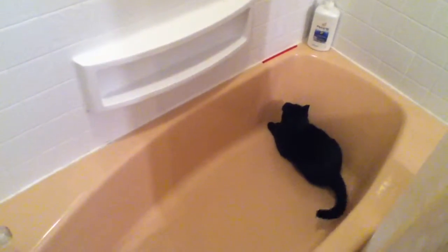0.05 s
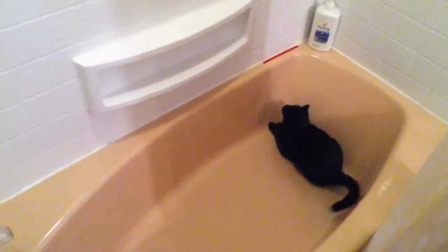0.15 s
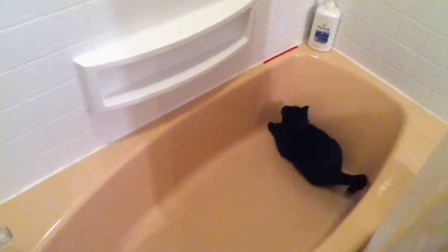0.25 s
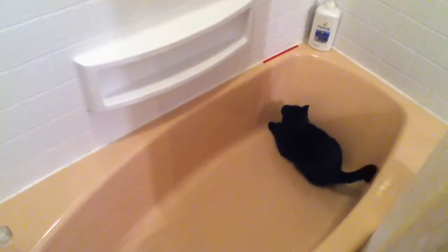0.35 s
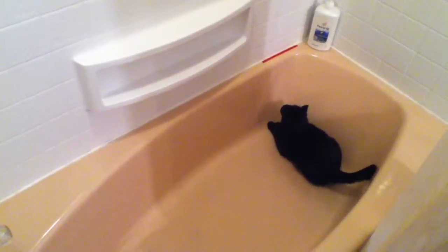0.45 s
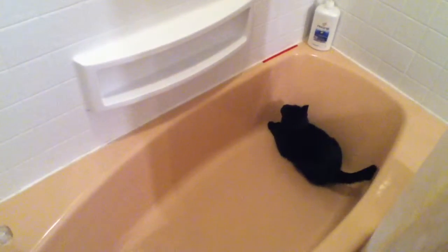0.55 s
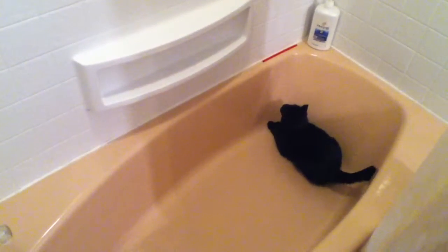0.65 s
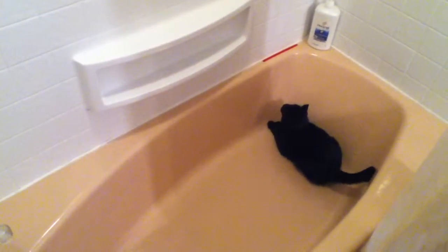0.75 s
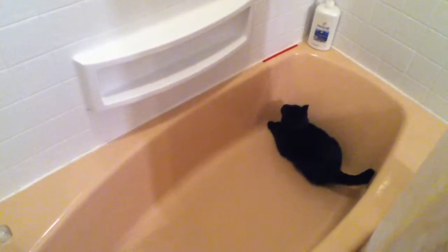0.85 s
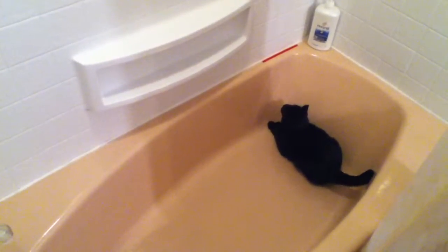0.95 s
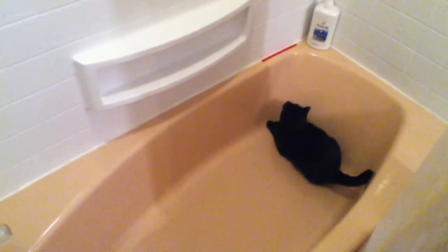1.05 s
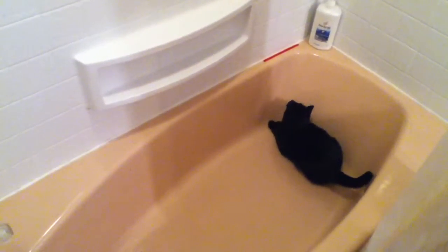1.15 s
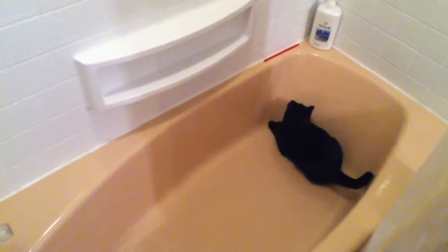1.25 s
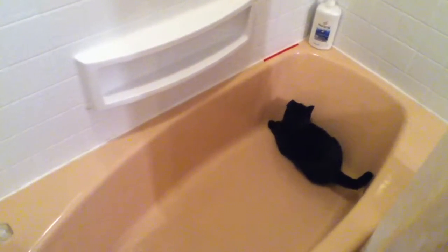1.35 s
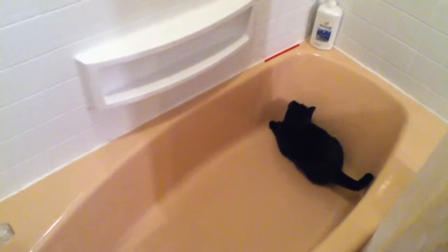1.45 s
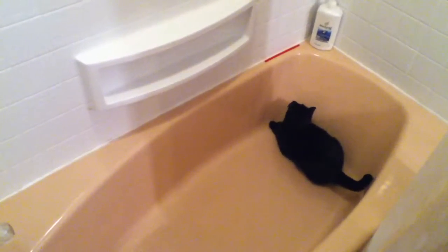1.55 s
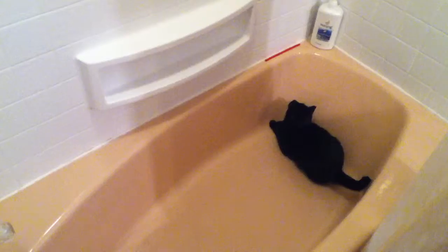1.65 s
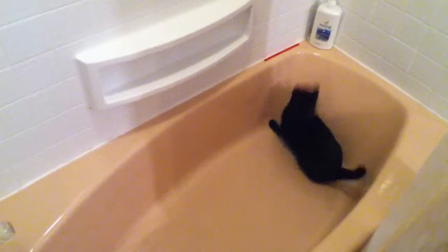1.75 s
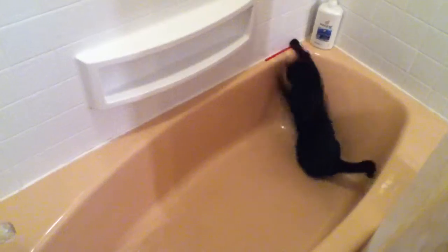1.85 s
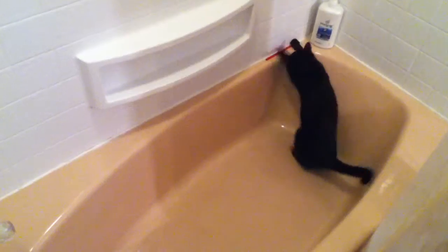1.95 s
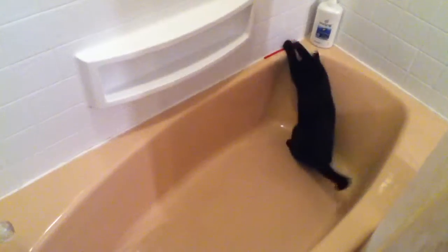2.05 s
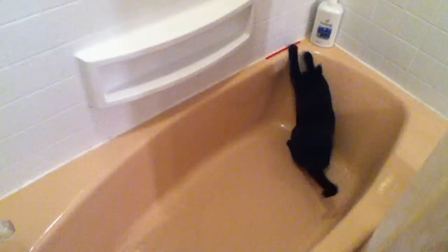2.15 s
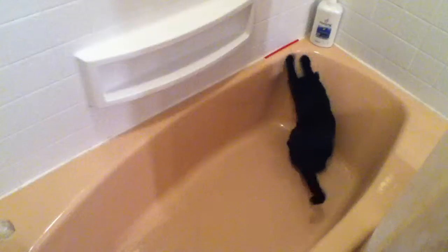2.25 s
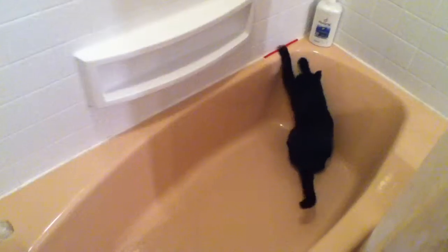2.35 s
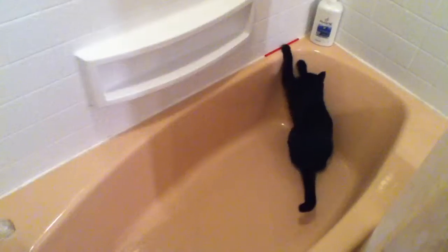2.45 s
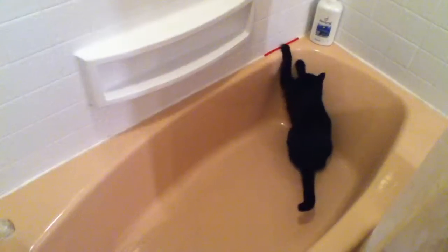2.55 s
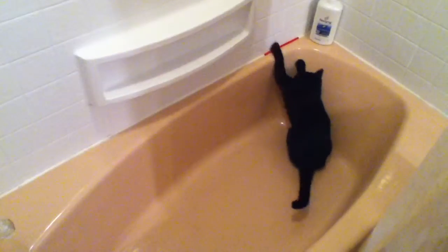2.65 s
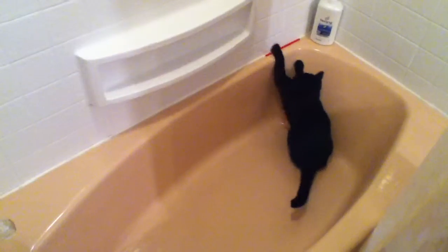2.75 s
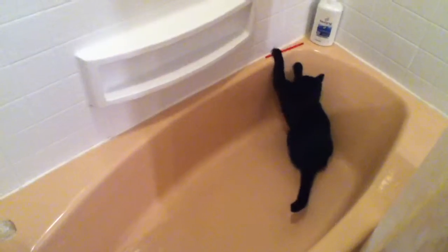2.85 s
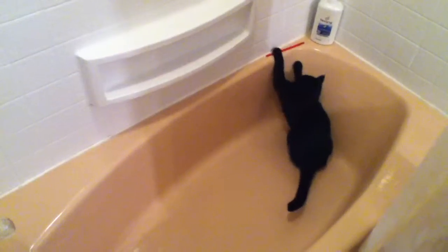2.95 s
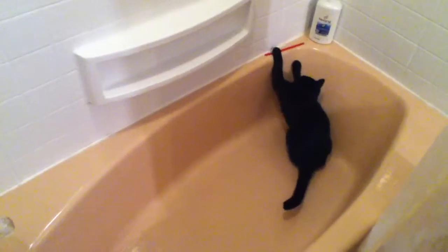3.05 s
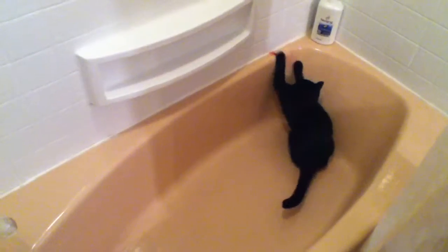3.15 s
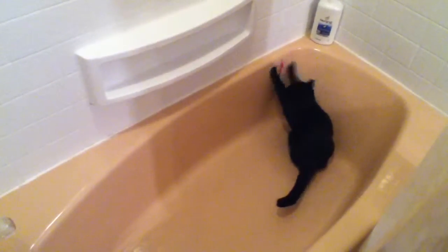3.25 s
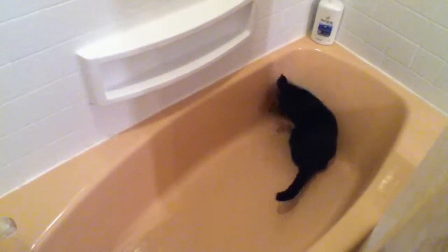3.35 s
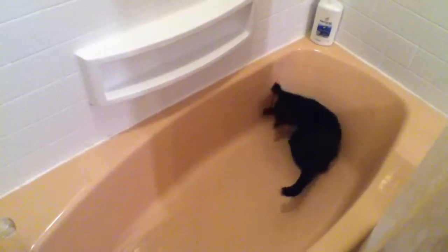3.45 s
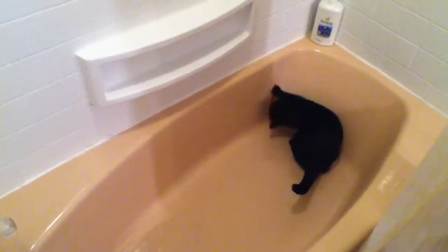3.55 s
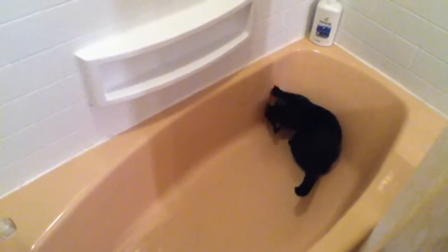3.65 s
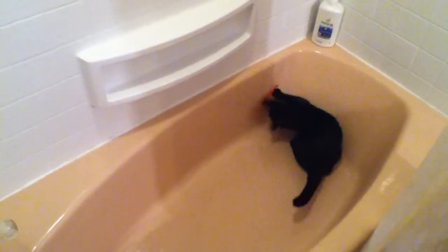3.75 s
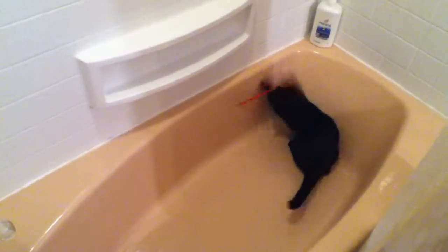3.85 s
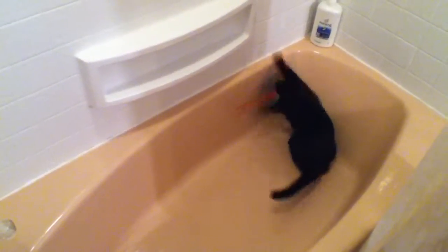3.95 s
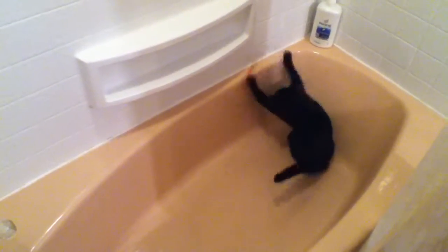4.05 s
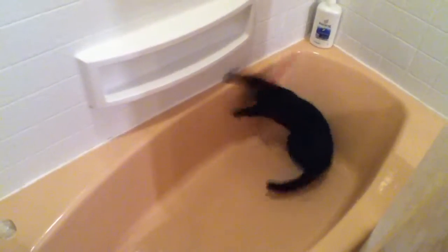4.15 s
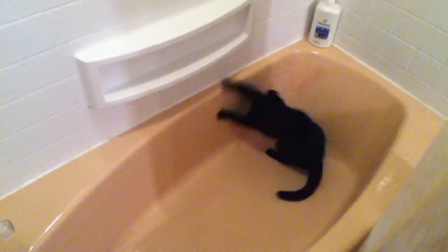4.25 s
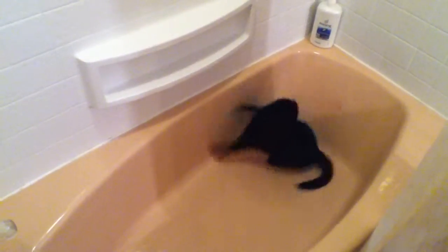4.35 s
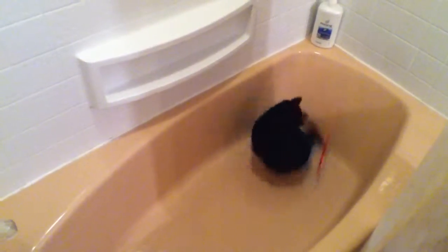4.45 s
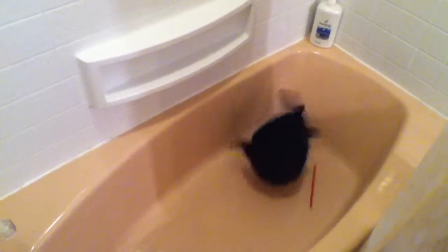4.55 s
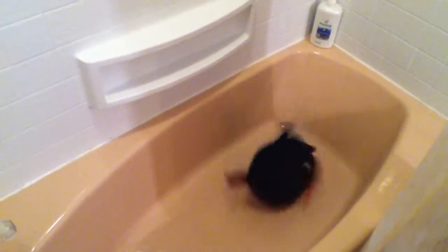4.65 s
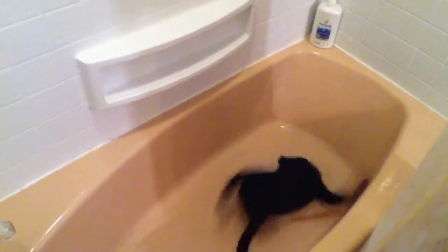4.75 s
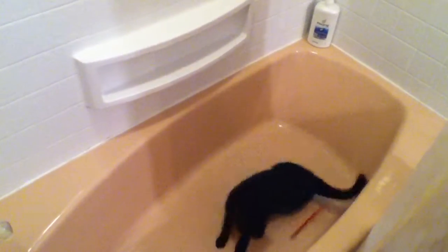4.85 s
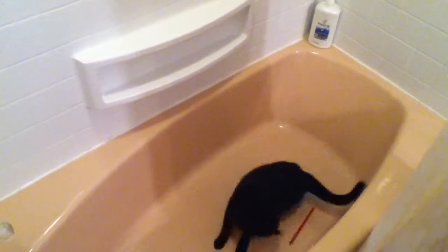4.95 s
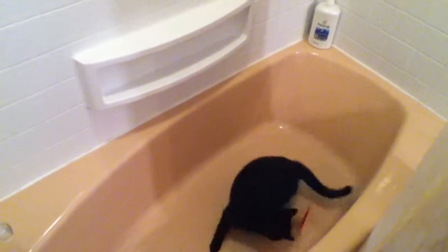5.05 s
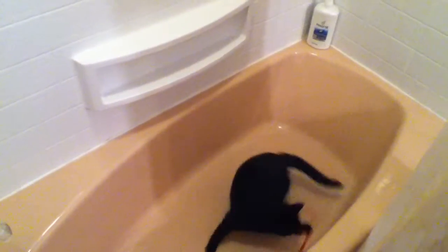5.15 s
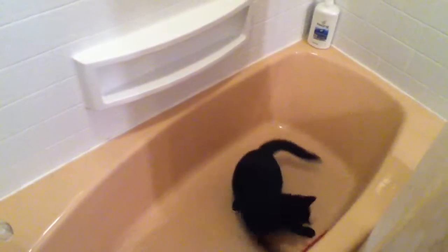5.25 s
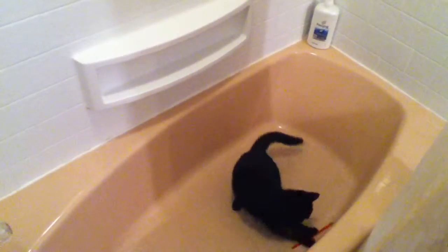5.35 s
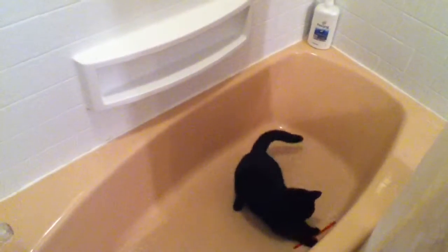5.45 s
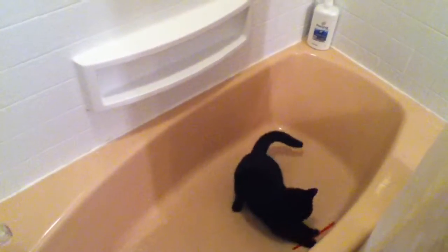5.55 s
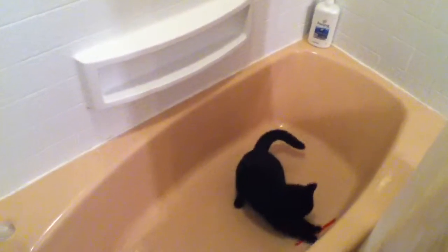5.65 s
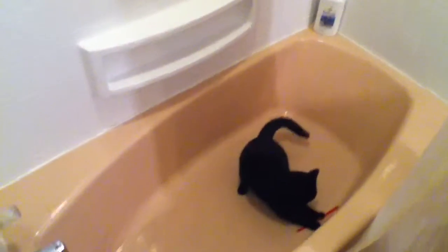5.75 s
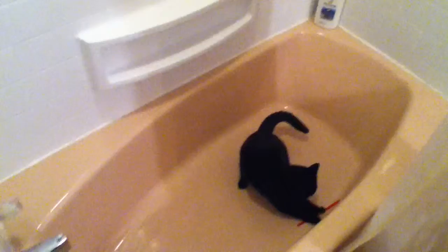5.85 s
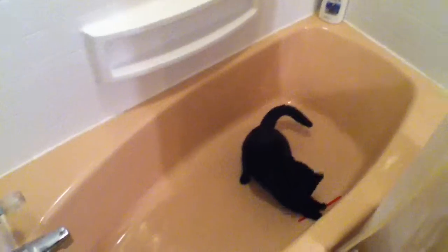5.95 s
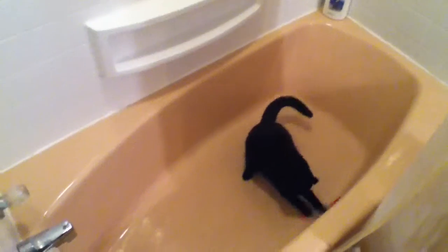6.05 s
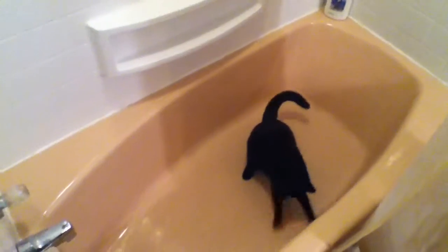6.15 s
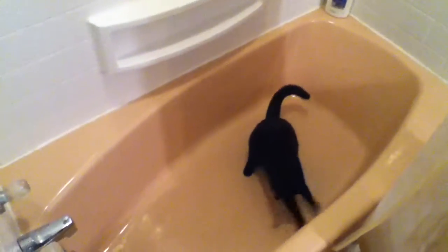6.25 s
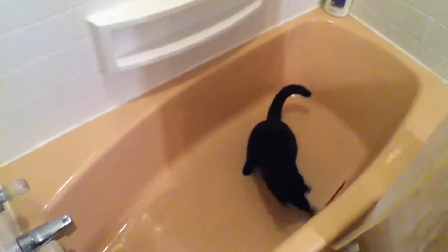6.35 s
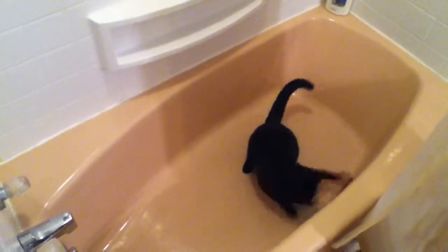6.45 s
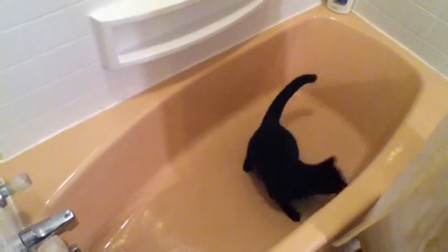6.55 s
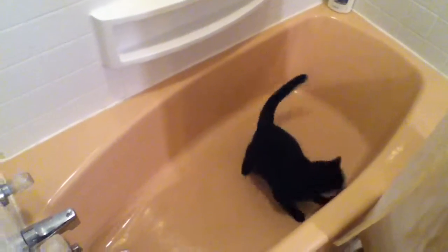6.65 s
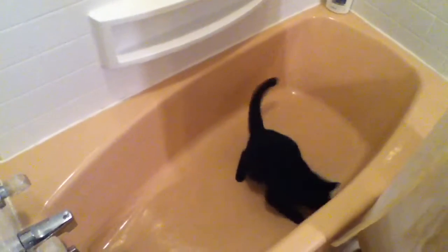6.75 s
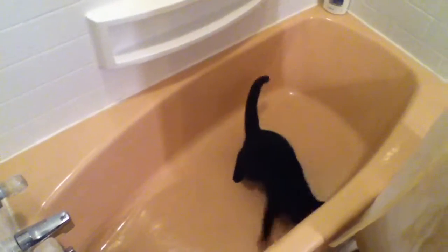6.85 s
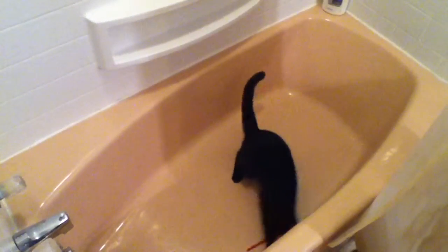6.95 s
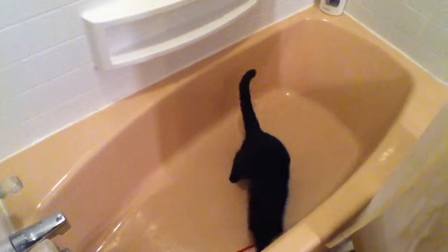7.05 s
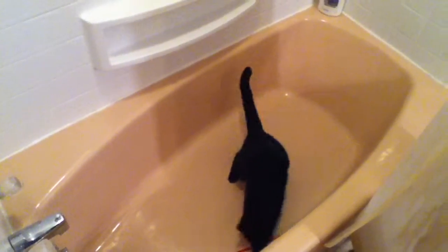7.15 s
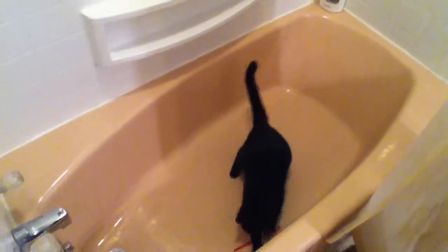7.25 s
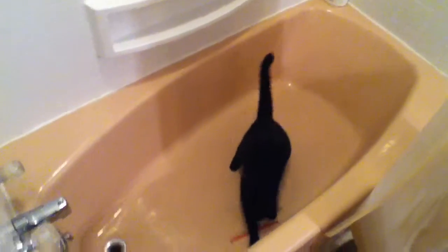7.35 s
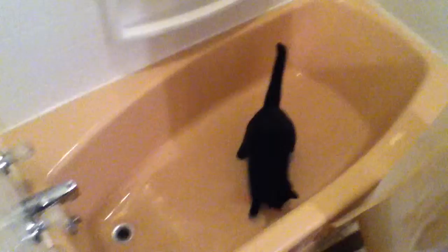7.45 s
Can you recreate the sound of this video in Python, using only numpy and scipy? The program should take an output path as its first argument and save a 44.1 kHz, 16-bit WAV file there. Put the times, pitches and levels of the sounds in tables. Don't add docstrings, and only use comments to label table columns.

```python
import sys
import numpy as np
from scipy import signal
from scipy.fft import rfft, irfft
from scipy.io import wavfile
from scipy.ndimage import uniform_filter1d

SR = 44100
rng = np.random.default_rng(int(sys.argv[2]) if len(sys.argv) > 2 else 0)


def digitize_waveform(pressure):
    field = np.atleast_2d(pressure).T
    bounded = np.clip(field, -1, 1)
    quanta = np.round(bounded * 32767).astype(np.int16)
    wavfile.write(sys.argv[1], SR, quanta)


def to_linear_factor(level_db):
    exponent = np.asarray(level_db, float) / 20
    return 10 ** exponent


N = 331632

# pitch in Hz, level in dB per Hz.
AIR_SPECTRUM = [(25, -52), (50, -21.5), (90, -11.5), (140, -16), (300, -9), (640, -15.5), (730, -22.5),
                (1700, -27.5), (2300, -34), (6500, -40), (9000, -36.5), (11000, -40.5), (13000, -46),
                (16000, -48)]
# pitch in Hz, level in dB rms.
STEADY_HUM = [(59.2, -65.5), (118.4, -57.5), (193.8, -47)]
# pitch in Hz, width in Hz, level in dB.
BLADE_TONES = [(102.4, 7.6, -67.5), (146.2, 2.8, -57), (200, 27, -51.5), (208, 2.1, -51),
               (390.1, 1.5, -50.5), (497, 4, -62.5), (810, 3.4, -67.5), (1077, 7.2, -73.5),
               (1144, 2.5, -73.5), (1270, 3.1, -69), (1470, 4.7, -69)]
# time in seconds, peak in dB, colour centre in Hz,
# colour width in octaves, contact in ms.
THUMPS = [(1.992, -20, 400, 0.94, 3), (4.122, -20, 200, 2, 22), (4.406, -22.5, 292, 0.24, 14),
          (4.319, -23.5, 121, 1.1, 6), (4.353, -10.5, 120, 1.6, 4), (4.389, -12, 191, 1.34, 5.4),
          (4.52, -23.5, 203, 2.8, 6), (4.813, -32, 93, 0.81, 6), (4.867, -33, 92, 0.77, 6),
          (4.905, -3.5, 306, 1.02, 7.6), (4.958, -11, 288, 0.93, 6), (4.935, -15, 511, 0.2, 17),
          (6.619, -19.5, 280, 1.9, 17), (7.019, -23, 190, 4.2, 6)]
# pitch in Hz, width in Hz, level in dB.
TUB_MODES = [(83.3, 28, -5), (94, 18.3, 2.5), (127.6, 8.6, 0.5), (160, 8.6, -8.5), (190.4, 20, -2),
             (245.4, 8.7, 2.5), (285.7, 13, -1), (347, 11.3, 5), (400, 18, 1), (300, 5, 2), (425, 6, -1),
             (484, 5.5, 7), (503, 7, 2), (542.7, 7.2, -2.5), (577, 14, -8), (682, 53, -3), (830, 9.7, -2),
             (903, 8.1, -3.5), (1030, 10, -2)]
# time in seconds, peak in dB, dullness as low-end dB,
# enamel ring in dB, favoured pitch in Hz.
CLAW_KNOCKS = [(1.9948, -7.5, 3, -21, 1980), (2.1308, -41, -8, -8, 1870), (2.7914, -26, -4, -12.5, 3340),
               (2.889, -45, -5, -4, 1600), (4.3196, -15.5, -11.5, -15.5, 2260), (4.36, -18, -7, -18, 3030),
               (4.533, -14, -14.5, -29, 3140), (4.907, -14, 0, -6, 2990), (4.945, -20, -19, -16.5, 2260),
               (4.925, -21, -2, -12, 4240), (6.6053, -27.5, 1.5, -11.5, 1470), (7.0242, -31.5, -6, 4, 2800),
               (7.045, -49, -14, -1, 2860)]
# pitch in Hz, width in Hz, level in dB.
ENAMEL_MODES = [(950, 250, 0), (1450, 250, 0), (1850, 300, -2), (2300, 300, 0), (2650, 130, 1),
                (2830, 130, 2), (3050, 180, -2), (3550, 250, 0), (4300, 300, -2)]
# start in seconds, length in seconds,
# hiss in dB, swell in dB from start to end, straw ring in dB.
DRAGS = [(2.137, 0.093, -52, -2, -4), (2.262, 0.078, -45, -3, -10), (2.901, 0.11, -44, 5, -11),
         (3.227, 0.095, -51, 0, -9), (3.392, .12, -42.5, 9, 2.5), (3.544, 0.096, -43.5, -20, -1),
         (3.754, 0.087, -45.5, -9, -3), (3.816, 0.091, -39, -4, -4), (4.087, 0.045, -43, 0, -9),
         (4.32, 0.12, -54.5, -19, 16), (5.139, 0.061, -40, -9, -1), (5.186, 0.082, -43.5, -9, -0.5),
         (5.254, 0.12, -41.5, -19.5, -4), (5.399, 0.062, -47, 2, -6), (4.138, 0.09, -31, -2, -3.5),
         (6.138, .1, -47, 0, -6), (6.28, 0.054, -53, -8, -3), (6.335, 0.18, -46.5, -11, -8),
         (6.535, 0.093, -61.5, -12, 14.5), (6.638, 0.15, -53, 3, 1), (6.776, 0.12, -44.5, 7, -1),
         (7.125, 0.19, -47.5, -16, -21), (7.308, 0.18, -54.5, -16, 2)]
# peak time in seconds, hiss in dB at the peak, fade in dB per
# second, # straw ring in dB.
SKIDS = [
    (2.542, -44, 172, -11),
    (3.129, -45, 170, -14),
    (4.225, -21, 2400, -3),
    (4.699, -29, 455, -3),
    (5.08, -35, 520, 0.5),
    (5.465, -31, 357, -29),
    (6.616, -21, 1200, -6),
    (7.012, -31, 145, 4),
]
# pitch in Hz, level in dB per Hz.
HISS_SPECTRUM = [(710, -11), (1200, -10.5), (2380, -13.5), (3290, -6), (4450, -8.5), (5070, -6.5),
                 (9610, -11.5), (15200, -19), (16000, -101)]
# pitch in Hz, width in Hz, level in dB.
STRAW_MODES = [(815, 60, -6), (1650, 65, 0), (2485, 75, -5), (3315, 100, 0), (4145, 85, -3), (4990, 95, -2),
               (5820, 90, -7), (6320, 110, -6), (6700, 110, -6), (7500, 130, -10), (8400, 180, -11),
               (9940, 180, -14)]
# time in seconds, peak in dB, crispness as high-end dB,
# ring in dB, favoured pitch in Hz.
TIP_TAPS = [(2.268, -41.5, -1, -6, 3140), (2.3046, -41, 2, 6.5, 4740), (2.5223, -37, -17, -2, 2470),
            (2.5366, -30, -20, 0, 3440), (2.5442, -42.5, -13, 6, 1650), (2.593, -36, -20, -17, 1660),
            (2.9224, -43, -5, 4.5, 3250), (2.94, -36.5, -6, -6, 3220), (3.1306, -30, -2, -6.5, 5300),
            (3.3821, -19, -15, 1, 6640), (3.4686, -28, -15, -1, 6500), (3.8969, -16, -18.5, -5, 3450),
            (4.1147, -25.5, -37, -5.5, 2820), (4.207, -31, -8, 4, 5060), (4.6834, -25.5, -2, 0, 4930),
            (4.8899, -27, -16, -12, 2820), (5.0655, -33, -2, 1, 4900), (5.4563, -26, -23, -2, 3320),
            (6.3543, -22, -24, -2, 4350), (7.148, -40, 4, -2, 4880)]
# time in seconds, ring in dB, pitch
# in Hz.
STRAW_RINGS = [(3.384, -44, 1720), (3.897, -40.5, 1700), (3.991, -40, 1700), (3.992, -36, 2485),
               (4.154, -35, 780), (4.154, -27, 3400), (4.175, -29, 3370), (4.176, -28, 2470), (4.21, -36, 3315),
               (4.225, -37.5, 1650), (4.535, -27, 3315), (5.071, -37, 3350), (5.168, -41.5, 3315),
               (2.54, -38.5, 3430), (5.318, -42, 3420), (6.356, -35, 1730), (6.37, -36.5, 3350),
               (6.612, -19.5, 6800), (6.661, -34, 4200), (7.149, -28.5, 4800)]
# time in seconds, peak in dB, crispness as high-end dB,
# ring in dB, favoured pitch in Hz.
FLAT_SLAPS = [(3.3907, -30.5, -32, 0, 3400), (3.989, -24, -10.5, -3, 4480), (4.1536, -19, -9, -10.5, 1670),
              (4.1716, -16.5, -12, 3.5, 4700), (4.2221, -21.5, -6, 9.5, 6170),
              (4.5191, -12, -13, -14, 2300), (4.6905, -21.5, -9, -1, 4440), (5.0376, -33.5, -13, -3, 4200),
              (5.159, -30.5, -15, -9, 3440), (6.2992, -48, -5, 1.5, 3310), (6.5633, -39, -1, -1, 3170),
              (6.6095, -16.5, -15, 1.5, 4500), (6.8495, -42, -17, 3, 5010), (7.0121, -28.5, -11, -6, 3440)]
# time in seconds, peak in dB, pitch in Hz, contact in ms.
SNAP = (5.1884, -21, 4900, .5)
# pitch in Hz, seconds to fall by 60 dB.
ECHO_TIMES = [(100, 0.75), (400, 0.49), (1500, 0.34), (4000, 0.26), (10000, 0.23)]


def evened(x):
    return x / np.sqrt(np.mean(x ** 2) + 1e-20)


def read(points, hz):
    f, value = np.transpose(points)
    return np.interp(np.log(hz + 1), np.log(f + 1), value)


def add(mix, s, sound):
    part = mix[round(s * SR):][:len(sound)]
    part += sound[:len(part)]


def hump(centre_hz, octaves):
    hz = np.geomspace(20, SR / 2, num=60)
    distance = np.log2(hz / centre_hz) / max(octaves, 0.15)
    return np.c_[hz, -13 * np.log(1 + distance ** 2)]


def coloured(points):
    hz = np.fft.rfftfreq(N, 1 / SR)
    white = rfft(rng.standard_normal(N))
    return evened(irfft(white * to_linear_factor(read(points, hz)), N))


def ring(x, modes):
    out = np.zeros(len(x))
    for k, (hz, width, db) in enumerate(modes):
        r = np.exp(-np.pi * width / SR)
        swing = [1, -2 * r * np.cos(2 * np.pi * hz / SR), r * r]
        out += (-1) ** k * to_linear_factor(db) * signal.lfilter([1 - r, 0, r - 1], swing, x)
    return out


def burst(noise, colour, contact_ms, snap=0.0):
    n = len(noise)
    ms = np.arange(n) * 1000 / SR
    blow = noise * (np.exp(-ms / contact_ms) + snap * np.exp(-ms / 0.87))
    spectrum = rfft(blow)
    lumps = uniform_filter1d(abs(spectrum), size=n // 256 + 1)
    blow = irfft(spectrum / (lumps + 1e-9), n) * (ms < ms[-1] / 2)
    log_gain = np.log(to_linear_factor(read(colour, abs(np.fft.fftfreq(n, 1 / SR)))))
    causal = np.exp(np.conj(signal.hilbert(log_gain)))[:n // 2 + 1]
    blow = irfft(rfft(blow) * causal, n)
    return blow / abs(blow).max()


def strikes(rows, modes, contact_ms, octaves):
    click, drive = np.zeros(N), np.zeros(N)
    first_touch = np.arange(4096) == 0
    for s, db, low_db, high_db, ring_db, hz in rows:
        noise = rng.standard_normal(4096)
        colour = [(250, low_db - 17), (800, low_db + 9), (1600, low_db / 2 + 5.5), (2500, 0.88),
                  (4500, -2.6), (6500, high_db / 2 + 6.5), (10000, high_db + 10.5), (16000, high_db - 0.5)]
        add(click, s, to_linear_factor(db - 2) * burst(noise, colour, contact_ms, snap=0.12))
        kick = first_touch + 0.12 * noise
        add(drive, s, to_linear_factor(db + ring_db) * burst(kick, hump(hz, octaves), contact_ms))
    return click + to_linear_factor(12) * ring(drive, modes)


def fan():
    t = np.arange(N) / SR
    out = to_linear_factor(-48) * coloured(AIR_SPECTRUM)
    for hz, db in STEADY_HUM:
        out += to_linear_factor(db) * np.sqrt(2) * np.sin(2 * np.pi * (hz * t + rng.random()))
    for hz, width, db in BLADE_TONES:
        out += to_linear_factor(db) * evened(ring(rng.standard_normal(N), [(hz, width, 0)]))
    return out


def thumps():
    push = np.zeros(N)
    pad = 1 - np.exp(-np.arange(8192) / SR / 0.002)
    first_push = np.arange(8192) < 24
    for s, db, hz, octaves, contact_ms in THUMPS:
        shove = 0.5 * pad * rng.standard_normal(8192) + 5 * first_push
        add(push, s, to_linear_factor(db - 10.5) * burst(shove, hump(hz, octaves), contact_ms))
    boom = 0.4 * push + to_linear_factor(18.5) * ring(push, TUB_MODES)
    no_bass = signal.butter(N=4, Wn=65, btype="high", fs=SR, output="sos")
    return signal.sosfilt(no_bass, boom)


def claw_knocks():
    high_db = -27.5
    rows = [(s, db, low_db, high_db, ring_db, hz) for s, db, low_db, ring_db, hz in CLAW_KNOCKS]
    return strikes(rows, ENAMEL_MODES, contact_ms=7, octaves=0.35)


def slides():
    t = np.arange(N) / SR
    grip_s, lift_s, skid_rise_db_per_s = 0.027, 0.013, 1500
    hiss, drive = np.zeros(N), np.zeros(N)
    for s, length, db, swell_db, ring_db in DRAGS:
        press = np.clip(np.minimum((t - s) / grip_s, (s + length - t) / lift_s), 0, 1)
        progress = np.clip((t - s) / length, 0, 1)
        level = press * to_linear_factor(db + swell_db * (progress - 0.5))
        hiss += level
        drive += level * to_linear_factor(ring_db)
    for s, db, fade, ring_db in SKIDS:
        level = to_linear_factor(db - np.maximum(skid_rise_db_per_s * (s - t), fade * (t - s)))
        hiss += level
        drive += level * to_linear_factor(ring_db)
    grip = to_linear_factor(3 * evened(uniform_filter1d(rng.standard_normal(N), size=150)))
    slips = grip * coloured(HISS_SPECTRUM)
    return to_linear_factor(-8.5) * hiss * slips + to_linear_factor(7) * ring(to_linear_factor(-6) * drive * slips, STRAW_MODES)


def straw_hits(table, low_db):
    rows = [(s, db, low_db, high_db, ring_db, hz) for s, db, high_db, ring_db, hz in table]
    return strikes(rows, STRAW_MODES, contact_ms=6, octaves=0.45)


def tip_taps():
    return straw_hits(TIP_TAPS, low_db=-24.5)


def straw_rings():
    click_db, ends_db = -13, -16
    rows = [(s, db + click_db, ends_db, ends_db, -click_db, hz) for s, db, hz in STRAW_RINGS]
    return strikes(rows, STRAW_MODES, contact_ms=6, octaves=0.2)


def flat_slaps():
    return straw_hits(FLAT_SLAPS, low_db=-6)


def close_snap():
    s, db, hz, contact_ms = SNAP
    out = np.zeros(N)
    add(out, s, to_linear_factor(db) * burst(rng.standard_normal(1024), hump(hz, 0.4), contact_ms))
    return out


def room(x):
    echoes = np.zeros(SR // 2)
    at = np.arange(120, SR // 2 - 20, 20)
    at = at + rng.integers(0, 20, len(at))
    echoes[at] = rng.choice([-1.0, 1.0], len(at))
    hz, t, z = signal.stft(echoes, SR, nperseg=256)
    decay = to_linear_factor(-60 * t / read(ECHO_TIMES, hz)[:, None])
    tail = signal.istft(z * decay, SR, nperseg=256)[1]
    return signal.fftconvolve(x, tail / np.linalg.norm(tail))[:N]


def scene():
    boom = thumps()
    play = claw_knocks() + slides() + tip_taps() + flat_slaps()
    rings = straw_rings()
    mix = fan() + close_snap()
    mix += boom + to_linear_factor(-10.5) * room(boom)
    mix += play + to_linear_factor(-3) * room(play)
    mix += rings + to_linear_factor(-6.5) * room(rings)
    return mix[None]


def roll_off(x):
    return signal.sosfilt(signal.butter(12, 16500, fs=SR, output="sos"), x)


def record(dry):
    band_limit = signal.firwin(511, 15900, window=("kaiser", 9), fs=SR)
    limited = signal.oaconvolve(dry, band_limit[None], "same")
    return roll_off(limited)


dry = scene()
out = record(dry)
digitize_waveform(out)
```